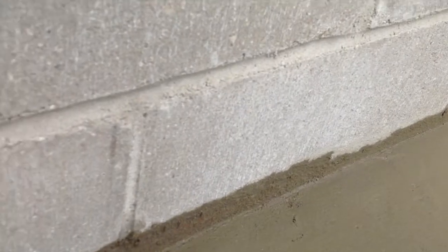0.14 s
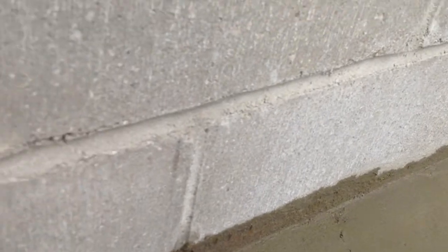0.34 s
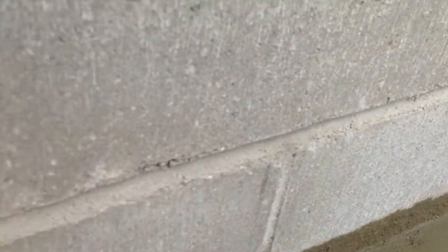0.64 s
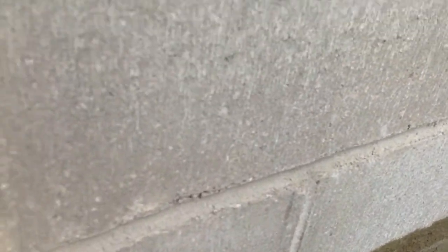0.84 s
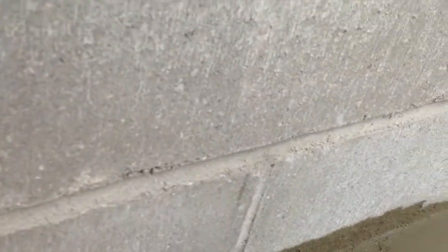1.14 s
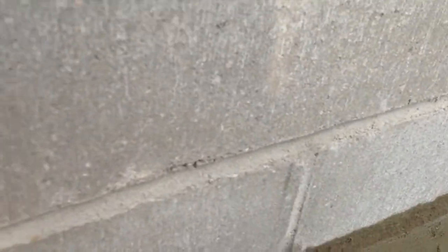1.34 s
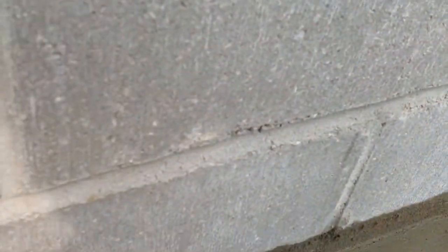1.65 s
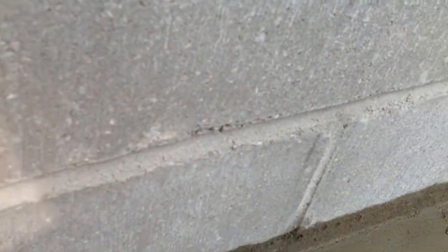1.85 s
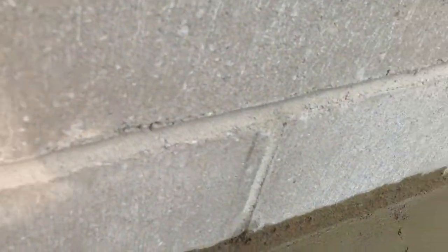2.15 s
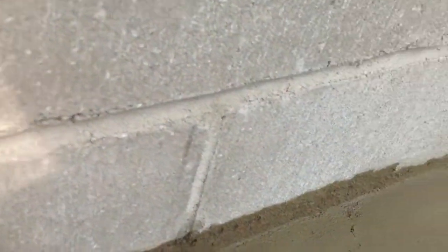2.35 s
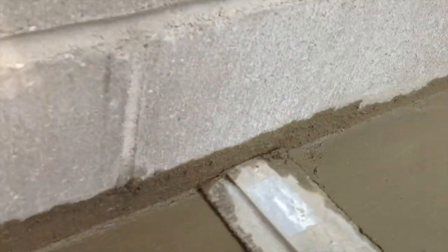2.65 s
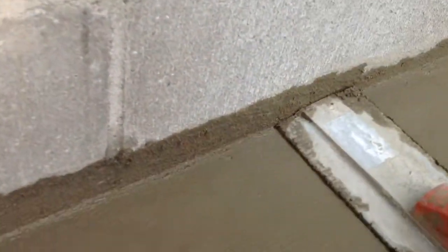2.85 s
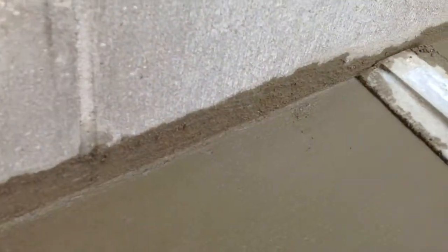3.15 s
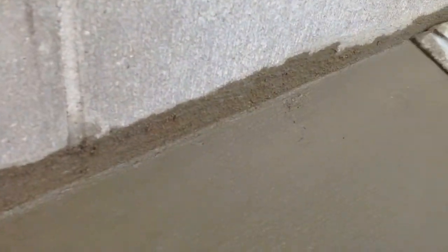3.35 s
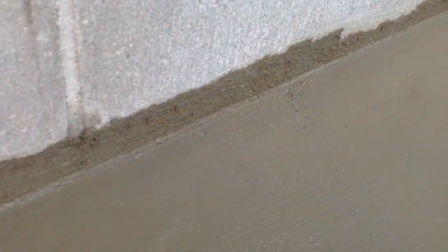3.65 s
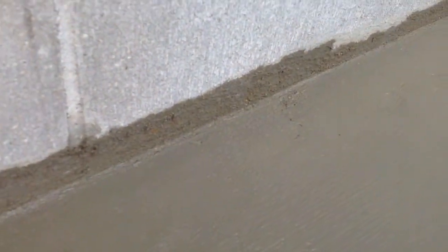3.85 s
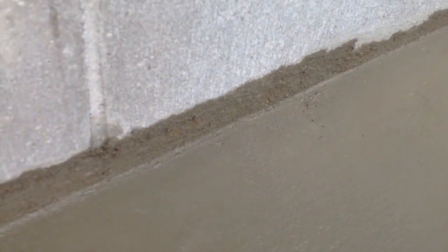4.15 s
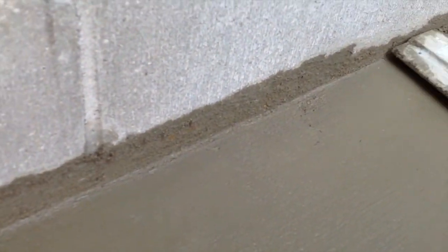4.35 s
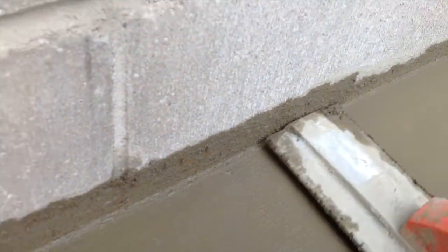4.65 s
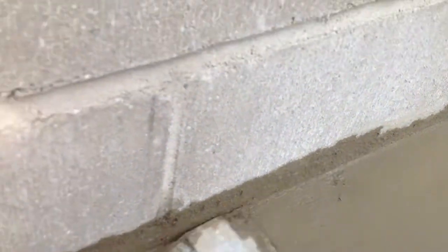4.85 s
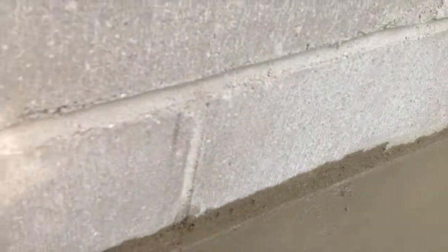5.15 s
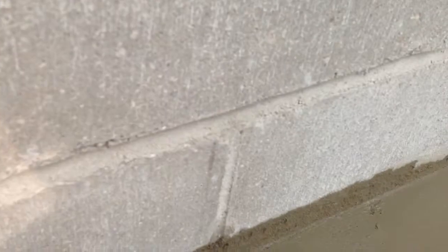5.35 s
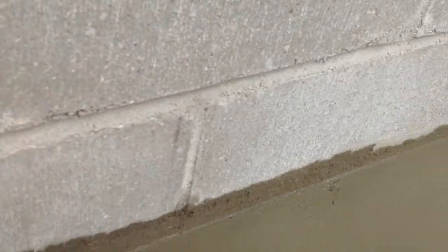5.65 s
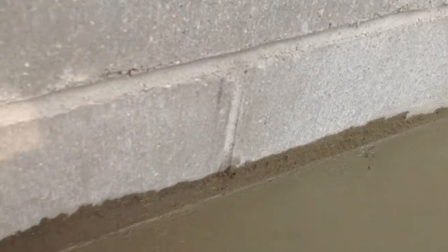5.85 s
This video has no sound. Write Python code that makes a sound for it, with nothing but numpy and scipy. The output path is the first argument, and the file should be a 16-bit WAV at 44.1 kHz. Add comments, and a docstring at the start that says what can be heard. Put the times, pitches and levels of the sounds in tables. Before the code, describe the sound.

Quiet outdoor air, then faint dull taps and a light sandy skim of a metal float. It slaps sharply onto wet concrete and makes a long, uneven gritty stroke with crunching grains, small squeaks and soft plops. After a short pause comes a shorter, louder stroke, then near silence and a hard hollow knock. Close microphone beside a block wall, very little echo.

```python
"""Still outdoor air comes first; in it a metal hand float taps on grit and skims lightly, close by.
It slaps onto wet concrete, then makes two long gritty strokes along the foot of a block wall, with grains
catching, squeaks and plops; a hard, hollow knock ends the scene. Random grain impulses excite colour filters
and resonances for rubbing; swelling sines make plops and knocks; decaying noise makes boom and echoes."""
import sys
import numpy as np
from scipy import signal
from scipy.fft import rfft, irfft, next_fast_len
from scipy.io import wavfile

SR = 44100
rng = np.random.default_rng(int(sys.argv[2]) if len(sys.argv) > 2 else 0)


def to_wav(sig):
    """Store sig (one row per channel, or 1-D mono) as 16-bit WAV at the path in sys.argv[1].

    Samples outside -1..1 are clipped; the rate is SR.
    """
    pcm = np.clip(np.atleast_2d(sig), -1, 1) * 32767
    pcm = np.round(pcm).astype(np.int16)
    wavfile.write(sys.argv[1], SR, pcm.T)  # frames by channels


N = 264585
TIME = np.arange(N) / SR
SQUEAK_HZ = 1865  # main resonance of the blade

# the hand's push, one table a stroke: t/s, relative pressure/dB, paste drag/dB, sand hiss/dB
STROKES = [
    [(1.528, -41.5, -54, -41), (1.61, -41, -49.5, -40), (1.72, -30.5, -35, -30.5),
     (1.87, -29, -42.5, -34.5), (1.96, -27, -41, -34), (2.11, -37, -46, -37), (2.29, -31, -42.5, -38.5),
     (2.35, -26, -44, -36.5), (2.47, -35.5, -45, -41.5), (2.55, -32, -45, -39), (2.8, -34, -47.5, -43.5),
     (2.96, -29, -47, -39.5), (3.05, -31.5, -52.5, -42.5), (3.23, -33.5, -47, -45.5),
     (3.31, -26, -66, -38.5), (3.38, -36, -56, -41.5), (3.46, -36, -59, -40)],
    [(4.077, -38.5, -52, -43.5), (4.19, -36, -56, -40.5), (4.27, -28.5, -54, -34), (4.45, -25, -40, -33.5),
     (4.64, -26.5, -44, -33), (4.70, -23.5, -48, -29), (4.77, -23.5, -38, -38), (4.86, -23.5, -31.5, -32.5),
     (4.93, -23.5, -42, -30.5), (4.955, -31, -40, -32.5), (5.03, -38.5, -50, -37), (5.066, -31.5, -49, -36)],
]
# the hollow between blade and slab, one table a stroke:
# t/s, upper resonance f/Hz, lower resonance f/Hz, metal against scrape level/dB
TILT = [
    [(1.52, 1758, 1330, -4), (1.672, 2610, 930, 0.5), (1.93, 2440, 970, 2.5), (2.03, 1900, 1050, 1),
     (2.266, 1960, 910, 2), (2.338, 2280, 1120, -1.5), (2.508, 1900, 907, -3), (3.096, 2090, 730, 0.5),
     (3.326, 2130, 1220, -1), (3.48, 1780, 1160, 1)],
    [(4.07, 2030, 810, 2), (4.108, 1510, 875, 4.5), (4.31, 1510, 1230, 0.5), (4.404, 1600, 1180, 1),
     (4.47, 1510, 654, -0.5), (4.6, 1730, 1040, -0.5), (4.69, 2400, 1150, 1.5), (4.77, 2000, 1010, 0),
     (4.96, 1900, 756, 0.5), (5.028, 1840, 1000, 4.5), (5.08, 2450, 1240, -1)],
]
# spectra of the rubbing, the dragged paste and the fine sand: f/Hz, density level/dB
SCRAPE_COLOUR = [(80, -68.5), (300, -19), (470, -9), (650, 3), (880, -6), (1070, 0.5), (1300, -3.5),
                 (1550, 0.5), (1900, -2.5), (2800, -14), (4000, -42.5), (12000, -52.5)]
PASTE_COLOUR = [(40, -27), (90, -53), (130, -10), (185, 0), (290, 0.5), (400, -3.5), (520, -5.5),
                (1500, -48), (8000, -75.5)]
HISS_COLOUR = [(200, -47.5), (1200, -7.5), (2900, 4), (4400, 0), (6400, -5.5), (7500, -11), (12000, -17.5),
               (15500, -31)]
STROKE_ATTACK_S, STROKE_RELEASE_S = 0.012, 0.018
FIRM_DB, RING_GROWTH = -31, 0.14  # above a firm push the metal gains on the scrape, in dB per dB


def strokes(judder_hz=70, judder_db=2.0, hiss_judder_db=1.0,
            scrape_db=-7, paste_db=-1, lumps_db=2.5, ring_db=-4.0, coupling_hz=520,
            grit_db=-10, grit_per_s=90, rasp_db=-11.5, rocking=0.032, rocking_hz=18,
            upper_db=-6, upper_width_hz=400, lower_db=-9.0, lower_width_hz=260):
    """Granular friction: rolling sand excites paste, metal and hollow; uneven grip modulates the contact."""
    contact = sum(gate(rows[0][0] - STROKE_ATTACK_S, rows[-1][0], STROKE_ATTACK_S, STROKE_RELEASE_S)
                  for rows in STROKES)
    pressure_db, drag_db, sand_db = curves(STROKES)
    upper_hz, lower_hz, metal_db = curves(TILT)
    metal_db = metal_db + RING_GROWTH * (pressure_db - FIRM_DB)
    scrape = contact * amp(pressure_db - metal_db)
    ring = contact * amp(pressure_db + metal_db)
    paste = contact * amp(drag_db)
    hiss = contact * amp(sand_db)

    upper_hz = upper_hz * (1 + rocking * wander(rocking_hz))  # the blade rocks on the grains
    judder = wander(judder_hz)
    jerks = stick_slip()
    grip = jerks * evened(amp(judder_db * judder))
    out = amp(scrape_db) * scrape * colour(grip * grains(1800, 3.9), SCRAPE_COLOUR)

    lumps = evened(amp(lumps_db * wander(30)))  # the paste gives way in lumps
    out += amp(paste_db) * paste * jerks * colour(lumps * grains(900, 3.3), PASTE_COLOUR)

    # the metal rings most when the hollow is tuned to it
    in_tune = 1 / (1 + ((upper_hz - SQUEAK_HZ) / coupling_hz) ** 2)
    out += amp(ring_db) * in_tune * ring * blade(grip * grains(2500, 1.2))

    # small stones tick one by one
    out += amp(grit_db) * scrape * colour(grains(grit_per_s, 1.3), CATCH_COLOUR)

    # the hollow under the blade sings at two moving pitches
    out += amp(upper_db) * ring * resonate(grip * grains(1200, 2.1), upper_hz, upper_width_hz)
    out += amp(lower_db) * scrape * resonate(grip * grains(1200, 2.8), lower_hz, lower_width_hz)

    out += amp(rasp_db) * hiss * jerks * sand_rasp()
    return out + hiss * colour(amp(hiss_judder_db * judder) * grains(12000, 3.8), HISS_COLOUR)


# resonances of the loaded float: f/Hz, width/Hz, relative level/dB
BLADE = [(1630, 240, -30), (1816, 54, 10.5), (1897, 45, 7), (2200, 260, 8.5), (2570, 116, -6.5),
         (2600, 150, -21), (4440, 390, -9)]


def blade(x):
    """Modal resonance: the wet mix damps the float, so each mode is broad and dies quickly."""
    t = np.arange(2048) / SR
    ring = 0
    for hz, width, db in BLADE:
        decay = np.exp(-np.pi * width * t)
        ring = ring + amp(db) * np.sqrt(width) * decay * np.sin(2 * np.pi * hz * t)
    high_pass = signal.butter(2, 900, "high", fs=SR, output="sos")
    return evened(signal.sosfilt(high_pass, signal.oaconvolve(x, ring)[:N]))


def sand_rasp(low_hz=2900, high_hz=4350, width_hz=420, rocking=0.042, rocking_hz=14):
    """Resonance under random excitation: fine sand rings two modes that drift as the blade rocks."""
    return sum(resonate(grains(2500, 3.6), hz * (1 + rocking * wander(rocking_hz)), width_hz)
               for hz in (low_hz, high_hz))


# the coarsest grains catching under the blade: t/s, relative level/dB, relative low push/dB, length scale/s
CATCHES = [(1.712, -12, -3.5, 0.0031), (1.783, -22.5, -6, 0.01), (1.801, -14, -14, 0.004),
           (1.819, -18, -1, 0.004), (1.8395, -8.5, -17, 0.0024), (1.86, -14.5, -6, 0.013),
           (1.886, -14, -8, .006), (2.001, -13.5, -8, 0.0066), (2.019, -18, -2, 0.0071),
           (2.079, -13, 0.5, 0.0045), (2.09, -16.5, 3.5, .005), (2.142, -14, -11, 0.0045),
           (2.152, -11, 5, 0.0047), (2.167, -17.5, 0, 0.0046), (2.237, -16, -11, 0.0093),
           (2.27, -18, 3, .005), (2.311, -14, 6.5, 0.0029), (2.352, -27, -10, 0.0021),
           (2.36, -20, -10, 0.0049), (2.424, -18, -4, 0.0078), (2.506, -16.5, -4, 0.004),
           (2.52, -11, -2, 0.004), (2.541, -15, -7, 0.0049), (2.56, -10.5, 1, 0.0024),
           (2.633, -27, 10, 0.0085), (2.821, -23.5, 7, 0.0051), (2.894, -17.5, -4, 0.0054),
           (2.924, -12.5, -10, 0.0035), (2.937, -11, 0, 0.003), (3.067, -19, -1, 0.0048),
           (3.11, -23, -13, 0.0087), (3.217, -26, -10, 0.0058), (3.277, -16, -5, 0.0079),
           (3.298, -9, -10, 0.0025), (3.328, -21, 1, 0.0027), (4.129, -17, -6, 0.0066),
           (4.148, -15, -7, 0.003), (4.222, -11, -9, 0.0024), (4.275, -19, -6, 0.0089),
           (4.6645, -16, -32, 0.0018), (4.686, -13, -4, 0.002), (4.705, -13, -14, 0.0029),
           (4.728, -17, -25, 0.007), (4.785, -7, -15, 0.003), (4.837, -14.5, -19, 0.0025),
           (4.868, -12.5, -17, 0.0034), (4.892, -19, -12, 0.0036), (4.937, -14.5, -7, 0.0039),
           (4.972, -11.5, -17, 0.0023), (4.9777, -6.5, -4, 0.00195), (5.005, -20, -11, 0.004)]


def stick_slip(surge_db=3.5, surge_s=0.013):
    """Stick-slip: the blade jerks free of each coarse grain, so the rubbing surges, then relaxes."""
    surges = sum(np.exp(-abs(TIME - s) / surge_s) * (TIME > s) for s, *_ in CATCHES)
    return amp(surge_db * surges)


# spectrum of a crunching grain: f/Hz, density level/dB
CATCH_COLOUR = [(50, -83), (200, -22), (480, -4.5), (720, 7.5), (1880, 5.5), (2400, 2), (3300, -5.5),
                (5000, -9.5), (8000, -21), (15500, -70)]
# spectrum of the metal grazed by a dry grain: f/Hz, density level/dB
GRAZE_COLOUR = [(1200, -17), (1850, 6.5), (2450, 12.5), (3400, -19)]


def catches(level_db=-2, push_db=-8, snap_db=-3, rise_s=0.0014, crumble_db=-14, crumble_s=0.022,
            graze_db=-11, graze_share=0.2, size_spread=.09):
    """Brittle fracture: a coarse grain cracks, shoves the paste and crumbles; random size shifts its colour."""
    out = np.zeros(N)
    t = np.arange(4096) / SR
    snap = colour(1. * (t == 0), CATCH_COLOUR)
    for s, db, low_db, length in CATCHES:
        main_crunch = np.exp(-(t / (1.54 * length)) ** 2)
        crumbling = amp(crumble_db) * np.exp(-t / crumble_s)
        crunch = (1 - np.exp(-t / rise_s)) * (main_crunch + crumbling)
        shift = np.exp(size_spread * rng.standard_normal())
        own_colour = [(hz * shift, level) for hz, level in CATCH_COLOUR]
        shove = np.sqrt(swell(t, length * 0.35))
        shoved_paste = amp(low_db + push_db) * burst(shove, PASTE_COLOUR)
        add(out, s, amp(db + level_db) * (burst(crunch, own_colour) + shoved_paste))
        # the less paste it shoves, the more it grazes metal
        add(out, s, amp(db + graze_db - graze_share * low_db) * burst(crunch, GRAZE_COLOUR))
        add(out, s + length / 2, amp(db + snap_db) * snap / abs(snap).max())
    return out


# instants at which the blade squeaks: middle t/s, peak level/dB, half length/s (to 1/e)
SQUEAKS = [(2.43, -23, .005), (2.509, -19.5, 0.0096), (2.64, -23.5, 0.007), (2.681, -26.5, 0.0078),
           (2.739, -27.5, 0.009), (2.756, -27, 0.0067), (2.823, -24.5, 0.0037), (2.966, -26, .008),
           (2.984, -24.5, 0.011), (3.115, -30, 0.0053), (3.156, -21.5, 0.0053), (4.787, -9.5, 0.002),
           (4.822, -13, 0.0024), (4.864, -15, 0.0082), (4.883, -11, 0.002), (4.931, -13, 0.0027)]


def squeaks(jitter=0.027, jitter_hz=70):
    """Frequency locking: stick and slip settle on the blade's main mode, a nearly pure, unsteady note."""
    hz = SQUEAK_HZ * (1 + jitter * wander(jitter_hz))
    note = np.sin(2 * np.pi * np.cumsum(hz) / SR)
    return note * sum(amp(db) * np.exp(-((TIME - s) / half) ** 2) for s, db, half in SQUEAKS)


# lumps of wet paste giving way: t/s, peak level/dB, pitch at the peak f/Hz
PLOPS = [(0.719, -40.5, 279), (1.545, -31, 272), (1.653, -33, 283), (1.892, -27.5, 292),
         (2.178, -23.5, 300), (2.356, -25.5, 263), (2.657, -28.5, 636), (2.757, -22, 697),
         (2.767, -31, 236), (2.866, -25, 634), (2.939, -15.5, 748), (4.242, -28, 460), (4.465, -23, 592)]


def plops(swell_s=0.003, sag_per_s=12):
    """Cavity resonance: a pocket in the paste opens, so a few soft cycles fall in pitch."""
    out = np.zeros(N)
    t = np.arange(2048) / SR
    for s, db, hz in PLOPS:
        turns = np.cumsum(hz * np.exp(-sag_per_s * (t - swell_s))) / SR
        add(out, s, amp(db) * swell(t, swell_s) * np.sin(2 * np.pi * turns))
    return out


# single grains of sand splitting: t/s, relative level/dB
SPLITS = [(1.424, -27.5), (2.022, -23), (2.083, -23.5)]
# spectrum of the bright tick: f/Hz, density level/dB
SPLIT_COLOUR = [(1500, -19), (4600, 6.5), (10000, -4.5), (15000, -15)]


def splits(swell_s=0.0014):
    """Brittle fracture: a single grain splits under the blade in a brief, bright tick."""
    out = np.zeros(N)
    t = np.arange(1024) / SR
    for s, db in SPLITS:
        add(out, s, amp(db) * burst(swell(t, swell_s), SPLIT_COLOUR))
    return out


# the heel scuffing as the hand shifts its grip: start t/s, end t/s, low ring level/dB, high ring level/dB
SCUFFS = [(1.436, 1.451, -60, -37.5), (1.511, 1.565, -43, -42.5)]


def scuffs(low_hz=1900, low_width_hz=110, high_hz=3970, high_width_hz=400, attack_s=0.0044, release_s=.007):
    """Selective modal excitation: fine sand under the heel alone rings two modes of the blade."""
    low = resonate(grains(4000, 2.1), np.full(N, low_hz), low_width_hz)
    high = resonate(grains(4000, 1.9), np.full(N, high_hz), high_width_hz)
    out = np.zeros(N)
    for start, end, low_db, high_db in SCUFFS:
        out += gate(start, end, attack_s, release_s) * (amp(low_db) * low + amp(high_db) * high)
    return out


# light brushes of the edge: start t/s, end t/s, relative level/dB, relative sand hiss/dB, flattening (0-1)
BRUSHES = [(0.45, 0.578, -39, -47, 0), (0.67, 0.81, -45, -54.5, 0), (0.764, 1.013, -26.5, -37.5, 1),
           (3.605, 3.656, -54.5, -62, 0.54)]
# resonances under the lifted blade as its angle flattens:
# first f/Hz, last f/Hz, width/Hz, first relative level/dB, last relative level/dB
SKIM_MODES = [(1440, 1770, 320, 3.5, 3), (2060, 2180, 320, -4.5, -0.5), (2500, 2600, 220, -12, -1),
              (3330, 3150, 220, -9, -1), (3800, 3770, 290, -6.5, -2.5), (4590, 4550, 190, -8, -5.5)]
# spectrum of the lightly loaded edge: f/Hz, density level/dB
SKIM_COLOUR = [(50, -96), (180, 1), (700, 3), (1050, -1), (1500, 12), (2000, 7), (2900, -4.5), (4500, -24),
               (9000, -22)]


def skim(edge_db=-2, flat_edge_db=-3, modes_db=-5, hiss_db=1, flat_hiss_db=5, uneven_db=0.2,
         rocking=0.016, rocking_hz=16, attack_s=0.077, release_s=0.016, sag_db_per_s=-34.5):
    """Light granular friction: the edge brushes fine sand; its rasp glides and brightens as the blade flattens."""
    edge, hiss, angle = np.zeros((3, N))
    for start, end, db, sand_db, flattening in BRUSHES:
        touch = gate(start, end, attack_s, release_s, sag_db_per_s)
        touch *= np.clip((TIME - start) / attack_s, 0, 1) ** flattening  # a flattening blade bites late and hard
        edge += amp(db) * touch
        hiss += amp(sand_db) * touch
        tilt = flattening * np.clip((TIME - start) / (end - start), 0, 1)
        angle = np.where(TIME < start, angle, tilt)
    flat = np.minimum(2 * angle, 1)
    rasp = np.zeros(N)
    for first, last, width, first_db, last_db in SKIM_MODES:
        hz = (first + (last - first) * angle) * (1 + rocking * wander(rocking_hz))
        mode_db = first_db + (last_db - first_db) * flat
        rasp += amp(mode_db) * resonate(grains(2200, 4.2), hz, width)
    body = amp(edge_db + flat_edge_db * flat) * colour(grains(6000, 1.8), SKIM_COLOUR) + amp(modes_db) * rasp
    sand = amp(hiss_db + flat_hiss_db * flat) * colour(grains(11000, 2.6), HISS_COLOUR)
    return amp(uneven_db * wander(44)) * (edge * body + hiss * sand)


# spectrum of the oozing wet grit: f/Hz, density level/dB
SQUELCH_COLOUR = [(60, -51), (220, 1.5), (800, -3), (1500, 5), (2200, 4.5), (4000, -16.5), (12000, -57)]
# the float settles into the wet mix: first touch, lying flat, at rest
TOUCH_S, FLAT_S, REST_S = 1.346, 1.387, 1.441


def squelch(body_db=-26.5, sag_db_per_s=-125, hiss_db=-43, spurt_db=-22, spurt_s=0.009,
            attack_s=0.0015, release_s=0.026):
    """Squeeze flow: wet grit oozes out as the float settles, with one spurt as the blade falls flat."""
    body = amp(body_db) * gate(TOUCH_S, REST_S, attack_s, release_s, sag_db_per_s)
    hiss = amp(hiss_db) * gate(TOUCH_S, REST_S, attack_s, release_s)
    hiss += amp(spurt_db) * gate(FLAT_S, FLAT_S, attack_s, spurt_s)
    return body * colour(grains(2300, 1.9), SQUELCH_COLOUR) + hiss * colour(grains(6000, 6.3), HISS_COLOUR)


# the blade tapping on grit: t/s, dull thud level/dB, relative crack/dB, relative blade ring/dB
TAPS = [(0.3084, -26.5, -25.5, -46), (0.319, -27, -17, -28), (0.3681, -34, -23.5, -37),
        (0.376, -46, -21.5, -52), (0.4363, -23, -4.5, -31.5), (0.6053, -55, -17, -40),
        (0.628, -63, -24.5, -47), (.663, -60, -35, -59), (0.694, -61, -27.5, -39.5), (4.067, -31, -16, -31)]
# pitched knocks of the blade: the skim's end, the slap into the wet mix, a soft tap before the thump:
# t/s, note level/dB, pitch f/Hz, swell/s, relative crack/dB
PITCHED_KNOCKS = [(1.021, -26, 1590, 0.00088, -13), (1.3458, -10, 480, 0.0015, -10.5),
                  (1.354, -9, 1040, 0.00088, -12.5), (1.369, -11, 1350, 0.0026, -31.5),
                  (1.3806, -8.5, 1260, 0.00089, 1.5), (1.3869, 0.5, 1310, 0.0035, 2.5),
                  (1.401, -10, 1560, 0.00068, -5), (1.4263, -19.5, 1500, 0.0024, -10.5),
                  (5.7705, -24, 248, 0.01, -18.5)]


def knocks(thud_hz=333, thud_swell_s=0.0025, pitched_ring_db=-23, pitched_spatter_db=-28):
    """Impact excitation: dry taps share one thud; pitched knocks ring the blade in proportion to their note."""
    out = np.zeros(N)
    for s, thud_db, crack_db, ring_db in TAPS:
        add(out, s, knock(thud_db, thud_hz, thud_swell_s, crack_db, ring_db))
    for s, note_db, hz, rise, crack_db in PITCHED_KNOCKS:
        ring_db = note_db + pitched_ring_db
        add(out, s, knock(note_db, hz, rise, crack_db, ring_db, spatter_db=pitched_spatter_db))
    return out


# modes of the blade ringing freely after a knock: f/Hz, relative level/dB, t60/s
FREE_BLADE = [(269, -8, .07), (1450, -12, .04), (1930, 0, .065), (2589, -9, .04), (2980, -3, .05),
              (3850, -6, .04), (4694, -11, .04), (5330, -10, .04), (6450, -11, .04)]
# spectrum of the cracking grit: f/Hz, density level/dB
CRACK_COLOUR = [(100, -26), (230, -2), (800, -1.5), (1400, 8), (2200, 1.5), (3000, -2), (4300, -2.5),
                (5500, -12.5), (9000, -19.5), (15500, -34.5)]


def knock(body_db, hz, rise, crack_db, ring_db, crack_s=0.0016, spatter_db=-21, spatter_s=0.013,
          chatter_db=-2, chatter_s=0.011):
    """Impact and free vibration: a choked note, grit that cracks and spatters, and metal that chatters."""
    t = np.arange(8192) / SR
    body = amp(body_db) * np.sqrt(swell(t ** 2, rise ** 2)) * np.sin(2 * np.pi * hz * t)

    spatter = amp(spatter_db) * np.exp(-t / spatter_s)
    crack = (np.exp(-t / crack_s) + spatter) * (1 - np.exp(-t / 0.00057))

    # the edge rattles on the grit after the first contact and keeps the modes going
    modes = sum(amp(db - 60 * t / t60) * np.sin(2 * np.pi * f * t) for f, db, t60 in FREE_BLADE)
    chatter = swell(t, chatter_s)
    chatter = chatter / np.linalg.norm(chatter)
    contact = (t == 0) + amp(chatter_db) * chatter * rng.standard_normal(len(t))
    ring = signal.oaconvolve(contact, modes)[:len(t)]
    return body + amp(crack_db) * burst(crack, CRACK_COLOUR) + .5 * amp(ring_db) * ring


# the float ringing on once lifted off the slab: f/Hz, width/Hz, relative level/dB
LIFTED = [(441, 180, -2), (800, 150, -3), (1192, 240, 1), (2000, 2400, -4.5), (2240, 120, -0.5)]
LIFT_S = 5.07


def lift_off(level_db=-42, attack_s=0.014, fade_s=0.081, damping_hz=2800):
    """Frequency-dependent damping: soft modes die away as the float leaves the slab, high ones first."""
    out = np.zeros(N)
    for hz, width, db in LIFTED:
        fade = gate(LIFT_S, LIFT_S, attack_s, fade_s / (1 + (hz / damping_hz) ** 2))
        out += amp(db) * fade * resonate(grains(2300, 2.9), np.full(N, hz), width)
    return amp(level_db) * out


# the thump's hollow body: f/Hz, level/dB, swell/s
THUMP = [(440, -7.5, .0029), (677, -1.5, .0019), (826, -.5, .0012), (1150, -12, .0014), (1650, -15, .0008)]
# spectrum of the boom: f/Hz, density level/dB
BOOM_COLOUR = [(60, -47), (120, -10.5), (210, 6), (340, -8.5), (470, 5.5), (620, 2), (800, -10), (1200, -9),
               (1900, -15.5), (2800, -25), (8000, -34), (15000, -39)]
# decay of the boom: f/Hz, t60/s
BOOM_T60 = [(120, 0.36), (250, 0.28), (3000, 0.21), (8000, 0.082)]
THUMP_S = 5.7959


def thump(click_db=-18.5, boom_db=2, click_s=0.0014, bloom_s=0.0028, echo_db=-17, echo_s=0.0178):
    """Impact on a cavity: a hard blow gives a click, a few choked cycles, one echo and a low boom."""
    out = np.zeros(N)
    t = np.arange(16384) / SR
    blow = -sum(amp(db) * swell(t, rise) * np.sin(2 * np.pi * hz * t) for hz, db, rise in THUMP)
    click_colour = [(200, -28.0), (1800, 8.0), (2400, -6), (8000, -1), (15000, -25)]  # f/Hz, density level/dB
    click = amp(click_db) * burst(swell(t, click_s), click_colour)
    boom = amp(boom_db) * colour(tail(BOOM_T60), BOOM_COLOUR) * (1 - np.exp(-t / bloom_s))
    add(out, THUMP_S, blow + click + boom)
    add(out, THUMP_S + echo_s, amp(echo_db) * blow)
    return out


# spectra of the rustle and of the air: f/Hz, density level/dB
RUSTLE_COLOUR = [(80, -43), (200, -11), (470, 3), (620, -6), (1200, -5), (2000, -9.5), (3000, -14),
                 (9000, -30)]
AIR_COLOUR = [(30, -52), (80, -22.5), (170, 1.5), (300, -4), (500, 0.5), (1200, -2), (4000, -12.5),
              (15000, -18.5)]
RUSTLE_S = 5.493  # a faint rustle grows from here until the thump


def background(air_db=-58.5, waver_db=-1.6, waver_hz=10.54, rustle_db=-61, growth_db_per_s=28):
    """Filtered noise: still outdoor air wavers slightly, and a faint rustle grows late on."""
    swelling = gate(RUSTLE_S, THUMP_S, 0.041, .02, growth_db_per_s)
    rustle = amp(rustle_db) * swelling * colour(grains(4000, 2.0), RUSTLE_COLOUR)
    air = amp(air_db + waver_db * wander(waver_hz)) * colour(rng.standard_normal(N), AIR_COLOUR)
    return rustle + air


def grains(per_s, spread_db):
    """Random impulse process: sand grains slip as clicks, a few much larger than the rest."""
    size = amp(spread_db * np.minimum(rng.exponential(1, N), 4))
    slips = rng.random(N) < per_s / SR
    return evened(size * rng.choice([-1, 1], N) * slips)


def resonate(x, hz, width):
    """Heterodyne resonance: a double pole follows the curve hz and is scaled to rms 1."""
    turn = np.exp(2j * np.pi * np.cumsum(hz) / SR)
    r = np.exp(-np.pi * width / SR)
    return evened((turn * signal.lfilter([1], np.poly([r, r]), x / turn)).real)


def colour(x, points, size=4096):
    """Minimum-phase filtering: a causal filter of unit energy takes the shape of the given spectrum."""
    log_gain = np.log(amp(read(points, abs(np.fft.fftfreq(size, 1 / SR)))))
    taps = np.fft.ifft(np.exp(np.conj(signal.hilbert(log_gain)))).real[:size // 2]
    return signal.oaconvolve(x, taps / np.linalg.norm(taps))[:len(x)]


def burst(envelope, points):
    """Shaped noise: a coloured crunch with a quarter of its envelope's energy."""
    x = colour(envelope * rng.choice([-1, 1], len(envelope)), points)
    return .5 * x * np.linalg.norm(envelope) / np.linalg.norm(x)


def tail(t60s, size=16384):
    """Diffuse reverberation: scattered echoes of unit energy, each band dying at its own speed."""
    hz, t, z = signal.stft(rng.standard_normal(size), SR, nperseg=256)
    x = signal.istft(z * amp(-60 * t / read(t60s, hz)[:, None]), SR)[1]
    return x / np.linalg.norm(x)


def wander(rate_hz):
    """Low-passed noise: smooth random motion of rms 1."""
    size = next_fast_len(N, True)
    hz = np.fft.rfftfreq(size, 1 / SR)
    spectrum = rfft(rng.standard_normal(size)) / (1 + (hz / rate_hz) ** 4)
    return evened(irfft(spectrum, size)[:N])


def swell(t, rise):
    """Build-up and decay: a bump that peaks at 1 after rise seconds."""
    return (t / rise * np.exp(1 - t / rise)) ** 2


def gate(start, end, attack_s, release_s, slope_db_per_s=0):
    """Amplitude envelope: attack, a hold that may sag or grow, and an exponential release."""
    held = np.clip(TIME, start, end) - start
    attack = np.clip((TIME - start) / attack_s, 0, 1)
    release = np.exp(-np.maximum(TIME - end, 0) / release_s)
    return attack * amp(slope_db_per_s * held) * release


def curves(tables):
    """Linear interpolation: one control curve for each column of the strokes' tables."""
    s, *columns = np.transpose(np.vstack(tables))
    return [np.interp(TIME, s, c) for c in columns]


def read(points, hz):
    """Logarithmic frequency scale: reads a table between its points."""
    f, value = np.transpose(points)
    return np.interp(np.log(hz + 1), np.log(f + 1), value)


def amp(db):
    """Level to amplitude: decibels become gain."""
    return 10 ** (np.asarray(db) / 20)


def evened(x):
    """Normalisation: scales to rms 1."""
    return x / np.sqrt(np.mean(x ** 2) + 1e-20)


def add(mix, s, sound):
    """Superposition: mixes a sound in at time s."""
    part = mix[round(s * SR):][:len(sound)]
    part += sound[:len(part)]


# decay of the echoes from wall and ground: f/Hz, t60/s
YARD_T60 = [(150, 0.091), (1000, 0.11), (4000, 0.033), (12000, 0.044)]


def scene(yard_db=-19):
    """Superposition: the float with weak echoes from wall and ground, the thump and the background."""
    rubbing = strokes() + skim() + squelch() + scuffs()
    events = catches() + squeaks() + plops() + splits() + knocks() + lift_off()
    tool = rubbing + events
    echoes = signal.oaconvolve(tool, tail(YARD_T60))[:N]
    return (tool + amp(yard_db) * echoes + thump() + background())[None]


def record(dry, low_cut_hz=120, edge_hz=15600):
    """Transducer limits: the microphone sheds deep bass, rounds peaks near full scale, then band-limits."""
    x = signal.sosfilt(signal.butter(3, low_cut_hz, "high", fs=SR, output="sos"), dry)
    limited = x / (1 + x ** 8) ** (1 / 8)
    low_pass = signal.firwin(511, edge_hz, window=("kaiser", 9), fs=SR)
    return signal.oaconvolve(limited, low_pass[None], "same")


dry = scene()
out = record(dry)
to_wav(out)
```